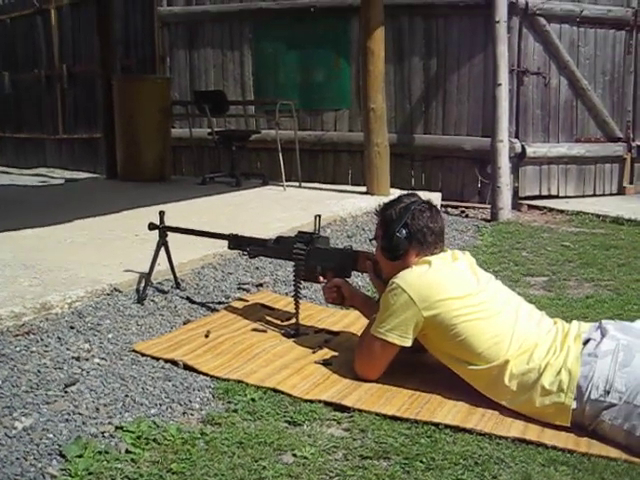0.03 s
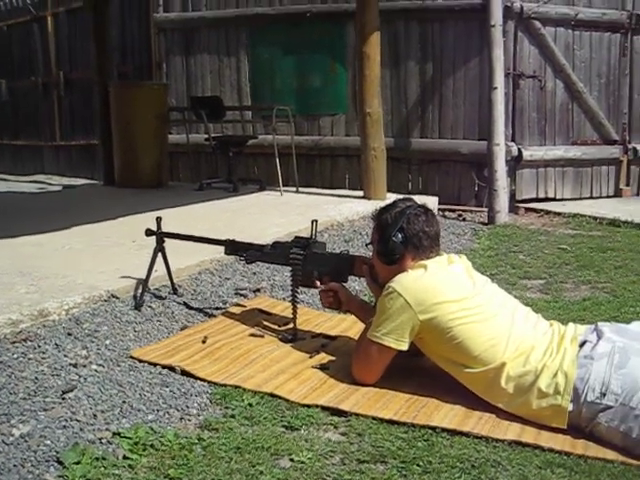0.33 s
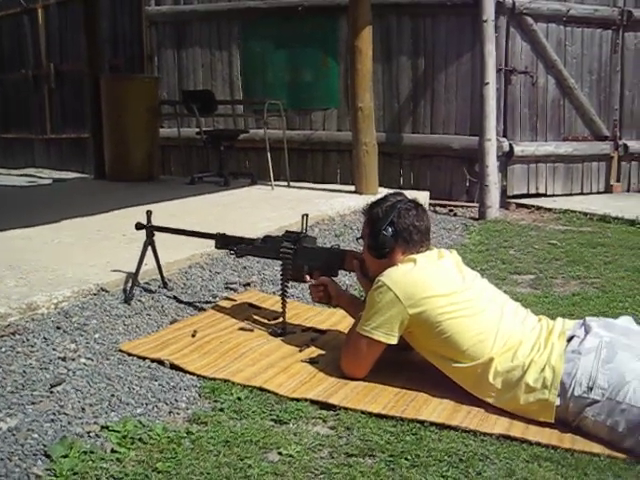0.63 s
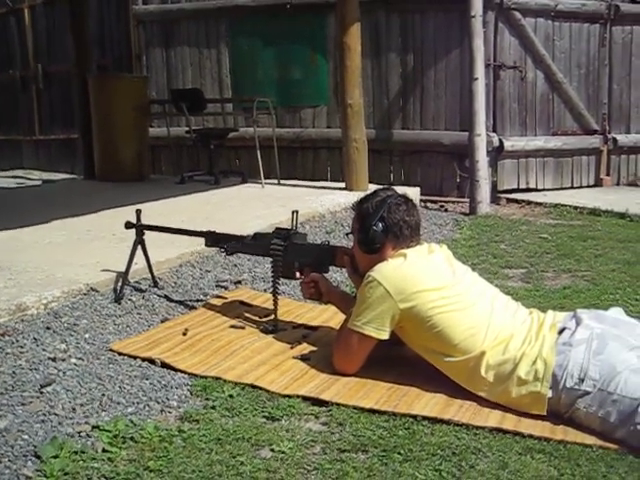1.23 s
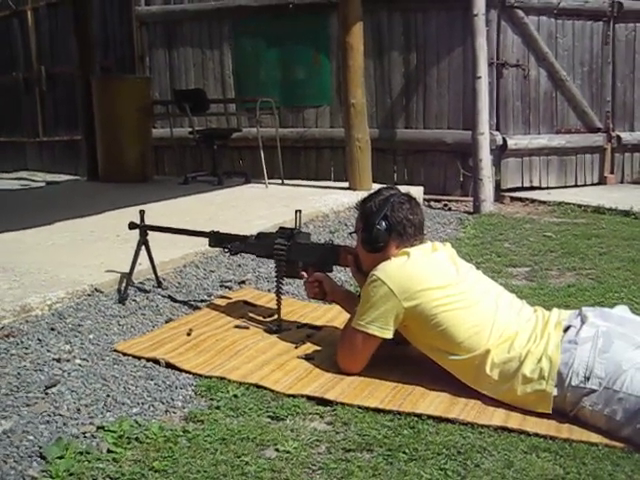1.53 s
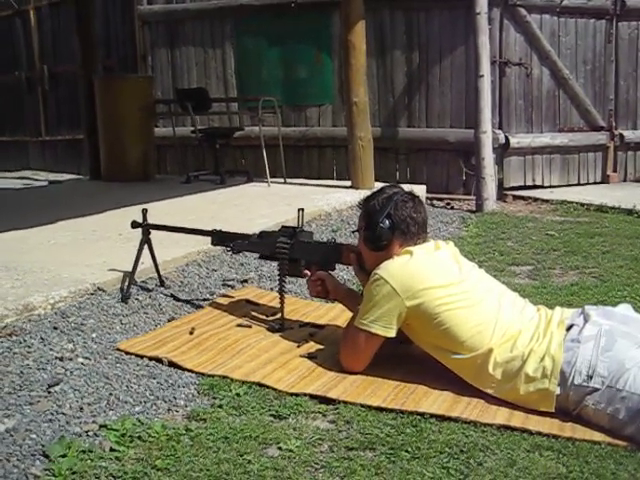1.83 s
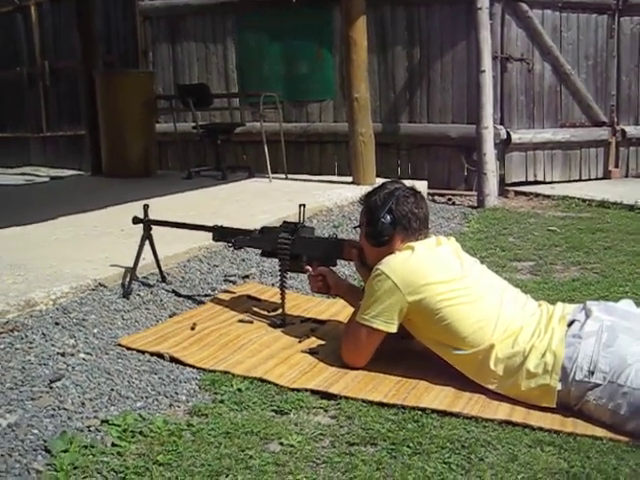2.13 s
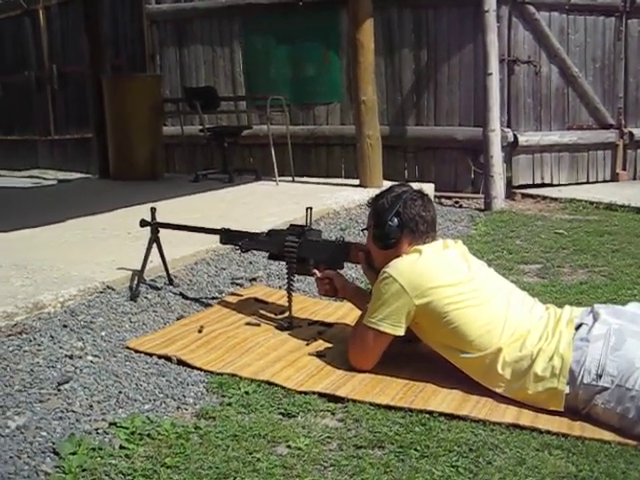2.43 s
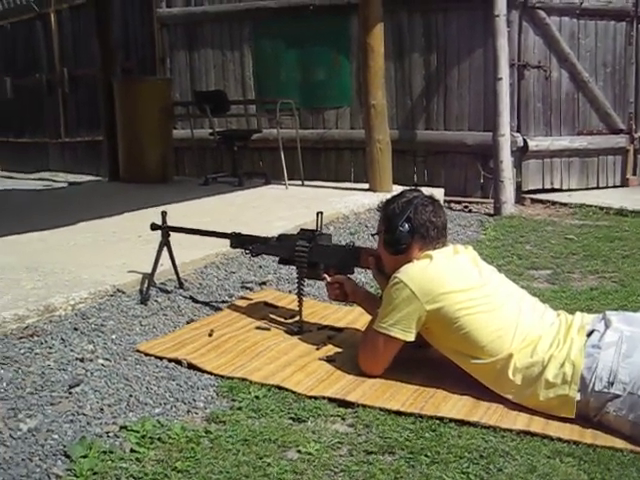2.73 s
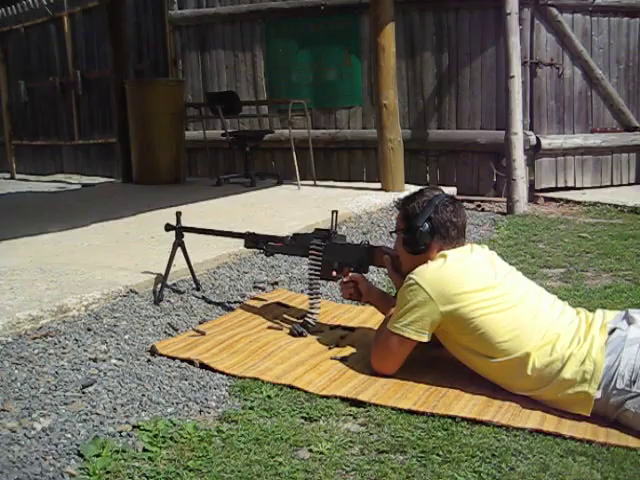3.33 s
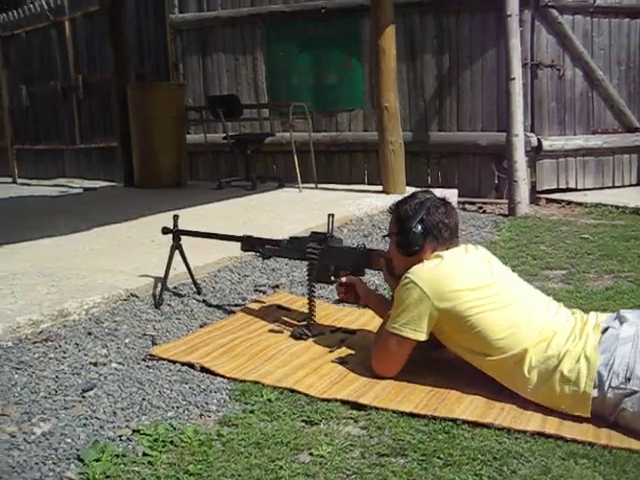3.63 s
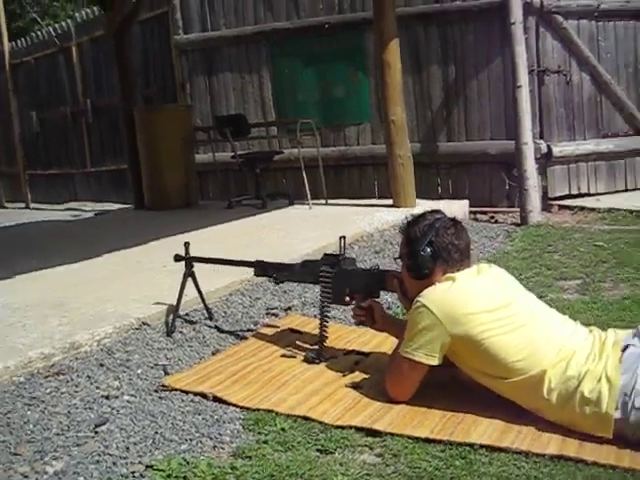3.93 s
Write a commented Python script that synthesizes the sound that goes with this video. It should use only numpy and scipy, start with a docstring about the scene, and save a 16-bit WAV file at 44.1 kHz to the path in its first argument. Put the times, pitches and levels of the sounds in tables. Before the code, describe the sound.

A machine gun fires three rapid shots at an outdoor range. Faint hiss and soft wind puffs come first, then the bolt clatters and the burst overloads the close microphone, echoing away as spent cases click down.

```python
"""An outdoor range, under a plank shelter; the microphone is a small camera's, close to the gun.
Hiss and whine, a faint insect, puffs of wind and light handling, then a belt-fed machine gun's bolt
clatters forward and three rounds fire. Each blast bounces round the shelter and rolls away over
the land while cases click down. The microphone overloads; gain control ducks the whole sound,
then slowly lifts the dying tail."""
import sys
import numpy as np
from scipy import signal
from scipy.fft import rfft, irfft
from scipy.io import wavfile

SR = 44100
rng = np.random.default_rng(int(sys.argv[2]) if len(sys.argv) > 2 else 0)


def transcribe(u):
    """Save the signal u as a 16-bit wav file named by the first command-line argument.

    u: samples, shape (n,) or (channels, n), limited to [-1, 1]; the rate is SR.
    q: integer samples, one column per channel.
    """
    v = np.clip(np.atleast_2d(u).T, -1, 1)
    q = np.round(v * 32767).astype(np.int16)
    wavfile.write(sys.argv[1], SR, q)


N = 176400
T = np.arange(N) / SR
HZ = np.fft.rfftfreq(N, 1 / SR)


def amp(db):
    """Decibels to gain."""
    return 10 ** (np.asarray(db) / 20)


def unit_rms(x):
    """Scales to rms 1."""
    return x / np.sqrt(np.mean(x ** 2) + 1e-20)


def bell(offset, width):
    """Gaussian curve, 1 at zero offset."""
    return np.exp(-.5 * (offset / width) ** 2)


def curve_at(points, hz):
    """Reads a table on a log-frequency axis."""
    f, value = np.transpose(points)
    return np.interp(np.log(hz + 1), np.log(f + 1), value)


def add(mix, start, sound):
    """Mixes a sound in at a time in seconds."""
    part = mix[round(start * SR):][:len(sound)]
    part += sound[:len(part)]


def coloured(white, spectrum):
    """Gives noise a spectral shape, at rms 1."""
    return unit_rms(irfft(rfft(white) * amp(curve_at(spectrum, HZ)), N))


def band(white, centre_hz, octaves):
    """Keeps a bell-shaped band of noise, at rms 1."""
    return unit_rms(irfft(rfft(white) * bell(np.log2((HZ + 1) / centre_hz), octaves), N))


def dying(x, t60s):
    """Lets each frequency die at its own speed."""
    hz, t, spectra = signal.stft(x, SR, nperseg=512)
    fade = np.exp(-np.log(1000) * t / curve_at(t60s, hz)[:, None])
    return signal.istft(spectra * fade, SR, nperseg=512)[1][:N]


# The camera's noise floor: f/Hz, relative level/dB
HISS_SPECTRUM = [(20, 0.5), (80, 0.5), (200, -0.5), (900, -3.5), (2000, -6), (4200, -8), (5200, -8),
                 (5900, -4), (6800, -9.5), (8100, -3.5), (9200, -12), (10200, 2.5), (11000, -1.5),
                 (12000, 3), (13000, -2.5), (15800, -7.5)]

def camera(whine_hz=7560, whistle_hz=11579, frame_hz=29.97, slip_rad=2, slip_s=0.0012):
    """The electronics hiss, whistle and whine; the whine slips back in phase once a picture frame."""
    slip = np.exp(1j * slip_rad * (T * frame_hz % 1))
    window = bell(T[:441] - T[220], slip_s)
    rounded_slip = signal.fftconvolve(slip, window / window.sum(), "same")
    tone = rounded_slip * np.exp(2j * np.pi * whine_hz * T)
    whine = amp(-41.5) * tone.real + amp(-58) * (tone ** 2).real  # with its octave
    whistle = amp(-59) * np.sin(2 * np.pi * whistle_hz * T)
    hiss = amp(-44.5) * coloured(rng.standard_normal(N), HISS_SPECTRUM)
    return whine + whistle + hiss


def insect(centre_hz=4750, glide_octaves=0.071, pulses_per_s=35):
    """A faint insect out in the grass: quick, evenly spaced pulses, each falling in pitch."""
    cycle = pulses_per_s * T
    pulse_index = cycle.astype(int)
    hz = centre_hz * 2 ** (-glide_octaves * (cycle % 1 * 4 - 1))
    strength = 1 + rng.random(N)[pulse_index]
    pulses = strength * np.maximum(np.sin(2 * np.pi * cycle), 0) ** 2
    turns = np.cumsum(hz) / SR + rng.random(N)[pulse_index]
    return amp(-65) * unit_rms(pulses * np.sin(2 * np.pi * turns))


# Puffs right on the microphone: t/s, level/dB, half-length/s
WIND_PUFFS = [(0.115, -53, 0.046), (0.228, -42.5, 0.013), (0.425, -37.5, 0.015), (0.513, -39, 0.0061),
              (0.554, -36.5, 0.03), (0.846, -46.5, 0.017), (1.262, -39.5, 0.027), (1.59, -49.5, 0.062),
              (2.4, -53.5, 0.13), (2.638, -53.5, 0.024)]
# Their rumble: f/Hz, relative level/dB
WIND_SPECTRUM = [(20, -4), (50, 8), (95, 3), (170, -9), (300, -14), (600, -47), (2000, -70)]

def wind():
    """Air brushes the microphone in soft, low puffs."""
    strength = sum(amp(db) * bell(T - peak, half) for peak, db, half in WIND_PUFFS)
    return strength * coloured(rng.standard_normal(N), WIND_SPECTRUM)


def camera_bump(at_s=1.2614, hz=117, half_s=0.0026):
    """A soft bump on the camera body gives one dull, heavily damped thud."""
    age = T - at_s
    return amp(-25.5) * bell(age, half_s) * np.sin(2 * np.pi * hz * age)


# Handling, then falling cases, near the microphone: t/s, level/dB, decay/s, f/Hz, width/octaves
METAL_CLICKS = [(1.4141, -39, .002, 2200, 0.57), (1.416, -49, 0.022, 690, 0.35),
                (1.418, -46, 0.02, 2200, 0.44), (1.6426, -45, 0.0066, 2800, .8),
                (3.3851, 1, 0.0087, 8600, 0.27), (3.677, -18, .012, 10450, .03)]

def metal_clicks():
    """Small metal parts are struck, each ringing briefly in its own band."""
    out = np.zeros(N)
    for start, db, decay, hz, octaves in METAL_CLICKS:
        add(out, start, amp(db) * np.exp(-T / decay) * band(rng.standard_normal(N), hz, octaves))
    return out


# Bolt and belt knocks, close up: t/s, level/dB, hold/s, decay/s
BOLT_KNOCKS = [(2.9246, -27, .003, 0.0024), (2.929, -1, 0.0022, 0.0042), (2.9488, 5.5, 0.0015, .0010),
               (2.956, -9, 0.00088, .002), (2.9604, -5, .001, 0.0027), (2.978, 1, 0.0011, 0.0023),
               (2.9821, 15, 0.002, 0.0012)]
# The struck steel: f/Hz, relative level/dB
STEEL_SPECTRUM = [(60, -7), (300, -5.5), (650, -22), (900, -4), (1200, -13.5), (1800, 1), (2600, -0.5),
                  (3400, 5), (4300, -7.5), (7000, -8.5), (8800, 0.5), (11000, -2.5), (13000, -9),
                  (16000, -18)]

def bolt(slide_at_s=2.951, slide_s=0.028, ring_decay_s=0.015):
    """The bolt is released, scrapes forward, strips a round from the belt and locks; the receiver rings."""
    force, t = np.zeros(N), T[:SR // 4]
    for start, db, hold, decay in BOLT_KNOCKS:
        add(force, start, amp(db) * np.exp(-np.maximum(t - hold, 0) / decay))
    add(force, slide_at_s, amp(-8) * (t < slide_s))  # the scrape along the rails
    clatter = force * coloured(rng.standard_normal(N), STEEL_SPECTRUM)
    retained = np.exp(-2 / (ring_decay_s * SR))
    ring_energy = signal.lfilter([1 - retained], [1, -retained], force ** 2)
    receiver = band(rng.standard_normal(N), centre_hz=2220, octaves=1)
    return clatter + amp(-15) * np.sqrt(ring_energy) * receiver


# The blast and its near echoes: t/s after the shot, rise/s, decay/s, level/dB, f/Hz, width/octaves
BLAST_AND_NEAR_ECHOES = [(0, 0.00084, 0.0098, 0, 5800, 0.91), (.009, 0.0023, 0.0049, 4, 2170, 0.68),
                         (0.019, 0.0011, 0.012, 0.5, 2550, 0.86), (0.046, 0.0022, 0.012, -4, 1500, 0.74),
                         (.052, 0.0037, 0.011, -2, 894, 0.33), (0.084, .004, 0.016, -15, 790, .6)]
# Echoes from far off: same columns
FAR_ECHOES = [(.368, 0.0045, 0.029, -27.5, 477, 1.0), (.53, 0.058, 0.046, -40, 1760, 0.47),
              (.74, .01, .12, -43, 800, .8)]

def blast_and_echoes(white):
    """The blast arrives direct, then each surface returns a short smear of it in its own band."""
    out = np.zeros(N)
    for delay, rise, decay, db, hz, octaves in BLAST_AND_NEAR_ECHOES + FAR_ECHOES:
        age = np.maximum(T - delay, 0)
        envelope = np.minimum(age / rise, 1) * np.exp(-np.maximum(age - rise, 0) / decay)
        out += amp(db) * envelope * band(white, hz, octaves)
    return out


# The shelter's ring around the microphone: f/Hz, relative level/dB
SHELTER_SPECTRUM = [(30, -16), (100, -30), (280, -7.5), (800, 2.5), (1400, 0.5), (3000, 0.5), (6000, -5.5),
                    (10000, -6.5), (16000, -19)]
# Its reverberation time: f/Hz, t60/s
SHELTER_T60 = [(60, 0.15), (300, 0.53), (1000, 0.32), (3000, 0.27), (8000, 0.24), (15000, .17)]

def shelter_ring(white, rise_s=0.012):
    """Reflections inside the shelter merge into a short, diffuse ring."""
    swell = np.minimum(T / rise_s, 1)
    return amp(3) * swell * dying(coloured(white, SHELTER_SPECTRUM), SHELTER_T60)


# Returns off the plank walls: t/s after the shot, half-length/s, level/dB, f/Hz, glide/(octaves/s)
PLANK_TONES = [(0.06, .0038, 0.5, 890, -21.5), (0.077, 0.0018, -9.5, 900, 0)]

def plank_tones():
    """Evenly spaced planks turn the blast into brief, hollow tones."""
    out = np.zeros(N)
    for delay, half, db, hz, glide in PLANK_TONES:
        age = np.clip(T - delay, -10 * half, 10 * half)
        turns = np.cumsum(hz * 2 ** (glide * age)) / SR + rng.random()
        out += amp(db) * bell(age, half) * np.sin(2 * np.pi * turns)
    return out


# The report coming back from the distance: f/Hz, relative level/dB
ROLL_SPECTRUM = [(30, -35), (80, -24.5), (160, -7.5), (280, 2), (450, 0.5), (660, -5.5), (950, -3),
                 (1400, -6.5), (2500, -3), (5500, -6.5), (8000, -8), (11000, -11.5), (15000, -47)]
# Its reverberation time: f/Hz, t60/s
ROLL_T60 = [(60, 4.2), (300, 2.08), (1000, 3.22), (2500, 2.066), (5000, 1.58), (8000, 1.063), (14000, 0.77)]

def land_roll(white, rise_s=0.21, return_s=0.353, spread_s=0.01, early_db=-9):
    """The land scatters the report into a long roll, weaker until the far ground answers."""
    before_return = (1 - np.tanh((T - return_s) / spread_s)) / 2
    swell = np.minimum(T / rise_s, 1) * amp(early_db * before_return)
    return amp(-20) * swell * dying(coloured(white, ROLL_SPECTRUM), ROLL_T60)


# The burst, at close range: t/s, relative level/dB, share of the common echo pattern/0-1
ROUNDS = [(2.9893, 2.5, 0.49), (3.0730, -0.5, 0.87), (3.1513, -0.5, 0.86)]

def gunfire(gain_db=37):
    """Each round excites partly the same echoes; the gun's gain lifts the blast and all its returns."""
    out = np.zeros(N)
    common = rng.standard_normal((2, N))
    planks = plank_tones()
    for start, db, share in ROUNDS:
        own = rng.standard_normal((2, N))
        sharp, diffuse = np.sqrt(share) * common + np.sqrt(1 - share) * own
        roll = land_roll(diffuse[::-1])  # reversed noise keeps it unrelated to the shelter's ring
        report = blast_and_echoes(sharp) + shelter_ring(diffuse) + planks + roll
        add(out, start, amp(gain_db + db) * report)
    return out


def scene():
    """All sources at the one microphone."""
    return (gunfire() + bolt() + metal_clicks() + wind() + camera_bump() + insect() + camera())[None]


def gain_control(x, threshold_db=-14, depth_db=32, attack_s=0.0034, recover_db_per_s=25):
    """The camera turns down quickly on a loud sound and comes back up slowly."""
    pole = np.exp(-1 / (attack_s * SR))
    power_db = 10 * np.log10(signal.lfilter([1 - pole], [1, -pole], x ** 2) + 1e-12)
    over_db = np.clip(power_db - threshold_db, 0, depth_db)
    recovery_db = recover_db_per_s * T
    held_db = np.maximum.accumulate(over_db + recovery_db) - recovery_db
    return x * amp(-signal.lfilter([1 - pole], [1, -pole], held_db))


# The camera's frequency response: f/Hz, level/dB
CAMERA_RESPONSE = [(10, -2), (50, -5), (150, -3.5), (1000, -1), (6000, -0.5), (10000, -3), (12500, -7.5),
                   (15500, -12.5)]

def camera_colour(x):
    """A minimum-phase filter thins the bass and softens the top."""
    hz = abs(np.fft.fftfreq(4096, 1 / SR))
    log_gain = np.log(amp(curve_at(CAMERA_RESPONSE, hz)))
    taps = np.fft.ifft(np.exp(np.conj(signal.hilbert(log_gain)))).real
    return signal.fftconvolve(x, taps[:len(taps) // 2])[:N]


def record(dry):
    """The camera's mono chain: gain control, overload, tone colour, band limit."""
    ceiling, knee, cutoff_hz = 0.62, 3.8, 15850
    ducked = gain_control(dry[0])
    overloaded = ducked / (1 + abs(ducked / ceiling) ** knee) ** (1 / knee)
    lowpass = signal.firwin(511, cutoff_hz, window=("kaiser", 9), fs=SR)
    return signal.oaconvolve(camera_colour(overloaded), lowpass, "same")[None]


dry = scene()
out = record(dry)
transcribe(out)
```